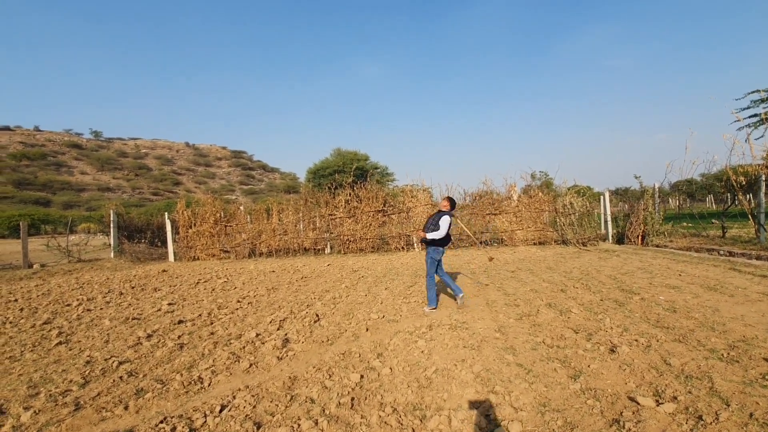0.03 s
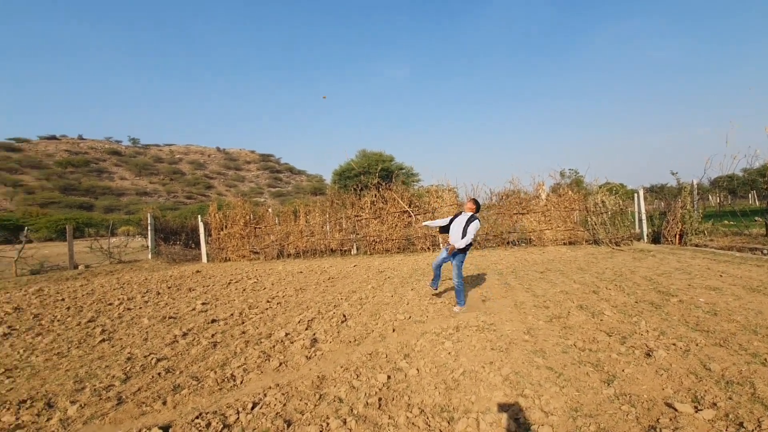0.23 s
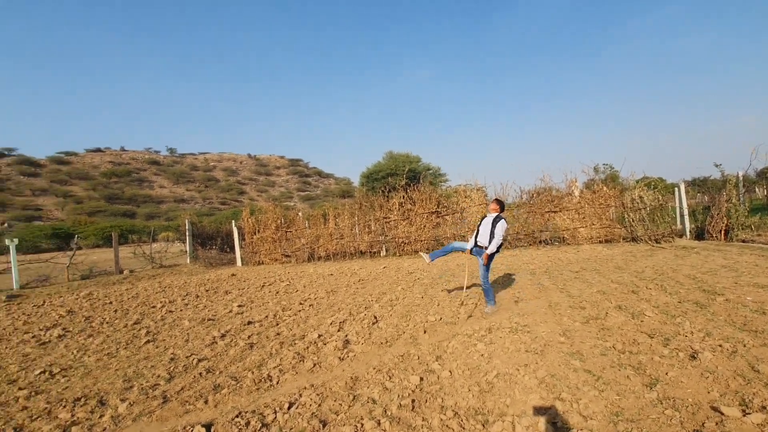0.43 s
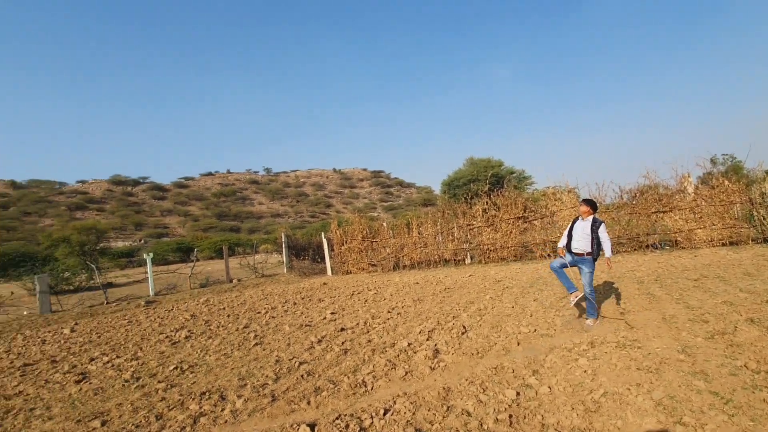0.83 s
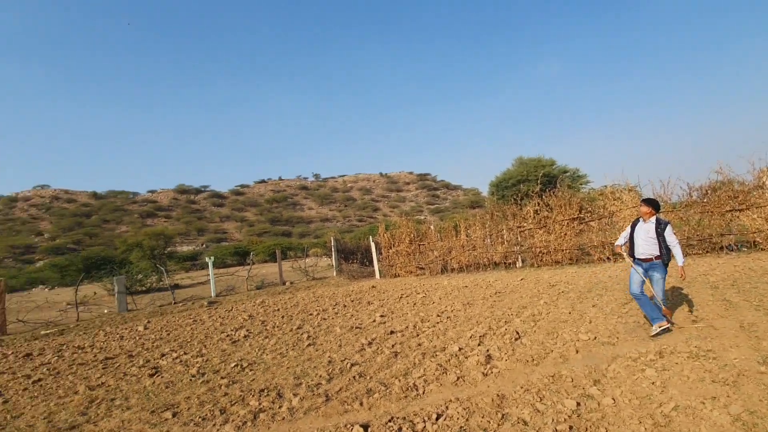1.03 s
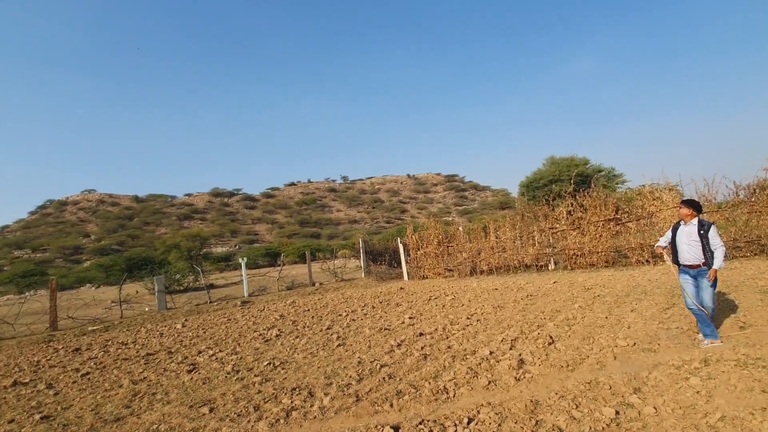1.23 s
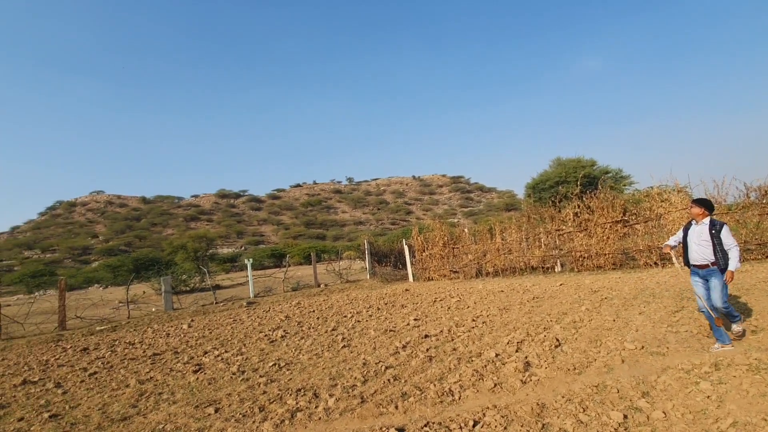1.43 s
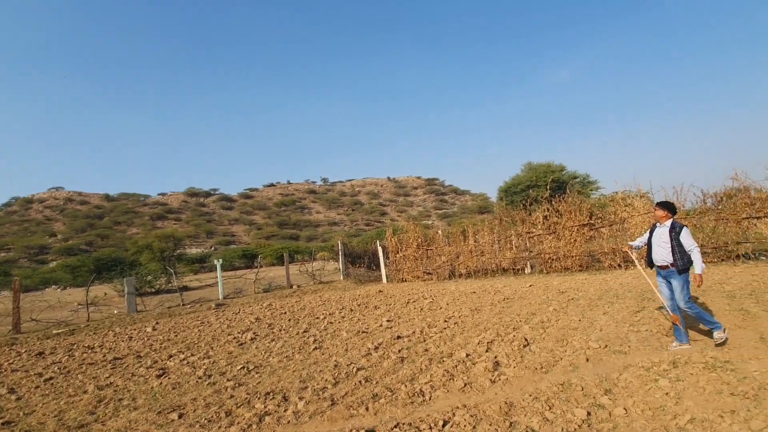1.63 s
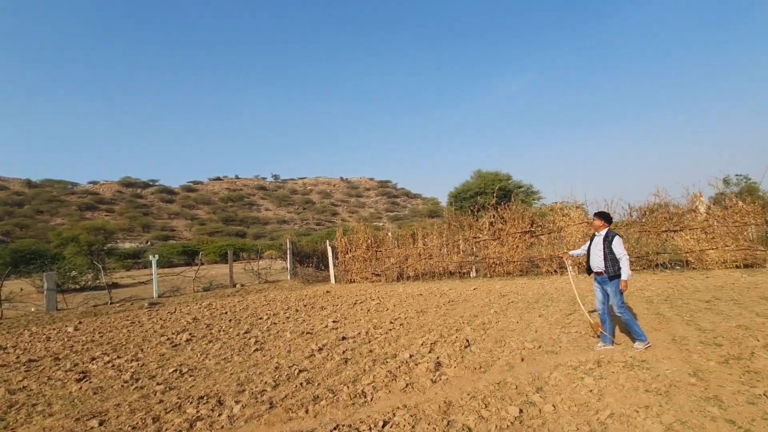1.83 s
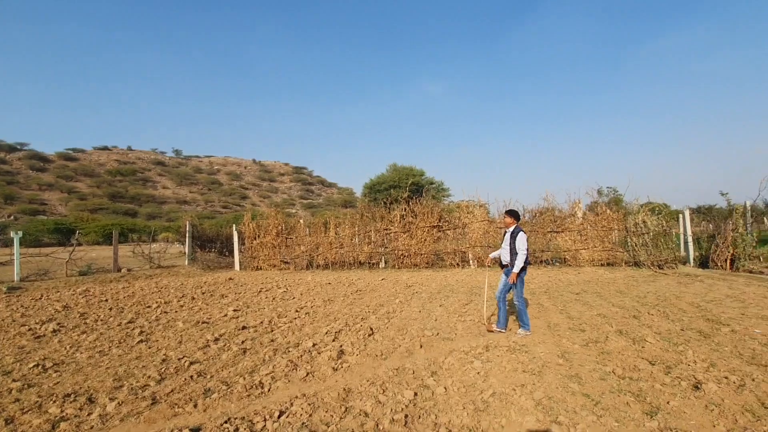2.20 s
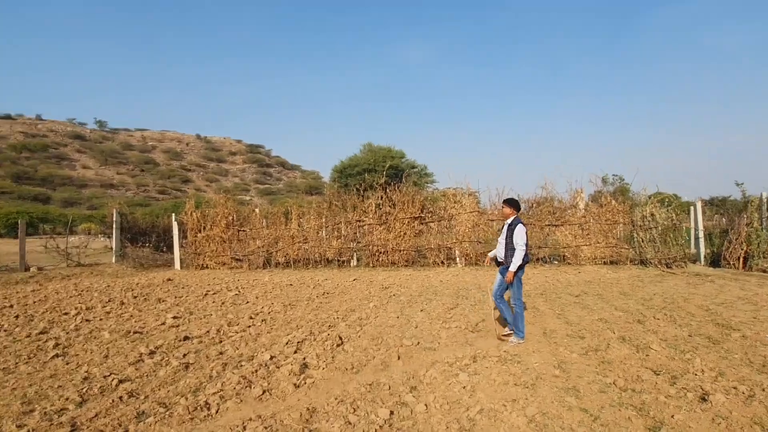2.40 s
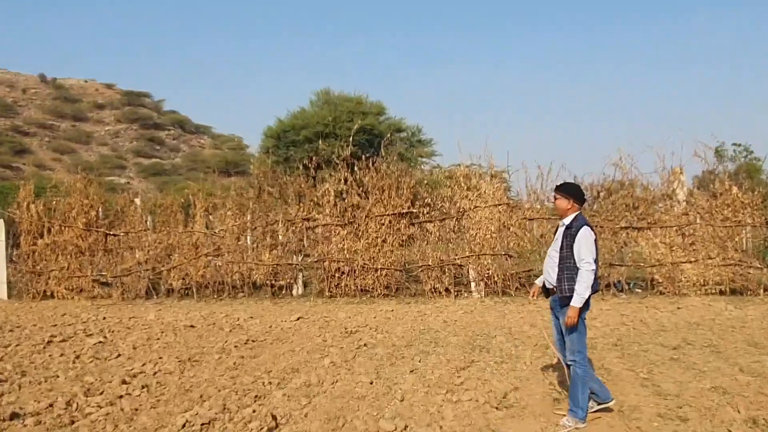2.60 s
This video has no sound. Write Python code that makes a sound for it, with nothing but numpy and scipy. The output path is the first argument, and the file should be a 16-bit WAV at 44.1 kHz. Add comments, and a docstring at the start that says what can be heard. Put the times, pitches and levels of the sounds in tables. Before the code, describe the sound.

A sling whirled and cracked once in an open field, with wind rumbling low.

```python
"""A ploughed field, with quiet country air and far birds. A sling is whirled: the cord swishes,
its tip cracks at the release, and the field scatters the crack back.
The slack cord whooshes round and slaps the dry soil; crumbs patter down and a foot scuffs.
Throughout, gusts buffet the two microphone ports in turn with rumble and low thumps."""
import sys
import numpy as np
from scipy.fft import rfft, irfft, next_fast_len
from scipy.io import wavfile
from scipy.ndimage import map_coordinates

SR = 44100
rng = np.random.default_rng(int(sys.argv[2]) if len(sys.argv) > 2 else 0)


def store_wav(level_fs):
    """Save 16-bit WAV to argv[1]."""
    pcm = np.round(np.clip(np.atleast_2d(level_fs), -1, 1) * 32767)
    wavfile.write(sys.argv[1], SR, pcm.T.astype(np.int16))


N = 121275

# Tone colours, as relative spectral density (f/Hz, level/dB)
AIR_TONE = [(100, 5.5), (300, 8.5), (600, 1.5), (1200, -3), (2200, -5.5), (4200, -8.5), (5500, -14),
            (7300, -21), (10000, -17), (15000, -15.5)]
RUMBLE_TONE = [(22, -26.5), (40, -8), (65, 0.5), (110, -16.5), (200, -28.5), (400, -45), (2500, -100)]
TREAD_TONE = [(200, 4), (800, 5), (1700, -8), (3000, -2), (6000, -15), (12000, -19)]
SHUFFLE_TONE = [(300, -17), (800, 1), (1200, 4.5), (1900, -7), (3000, -2), (4100, 1.5), (4800, -14),
                (8000, -30)]
SOIL_TONE = [(200, 3.5), (600, 9.5), (1000, -0.5), (2000, 1), (2700, -9.5), (4500, -2.5), (9500, -9.5),
             (11500, -12.5), (15000, -11.5)]
SLAP_BODY_TONE = [(250, -9), (650, -2), (1000, -13.5), (3000, -25)]
SWISH_TONE = [(60, -23), (150, 4.5), (320, 3), (450, -8.5), (600, -2), (1000, -13.5), (1650, -15.5),
              (2100, -25), (5500, -32), (10000, -43.5), (14000, -48.5)]
CORD_HISS_TONE = [(3000, -3.5), (5500, -2.5), (7500, -16), (9500, 0.5), (11500, -6.5), (14000, -22)]
WHUMP_TONE = [(120, -4.5), (220, -12.5), (300, 2), (420, -16.5), (560, -10.5), (900, -27), (2000, -52)]
SNAP_TONE = [(1000, 7.5), (3500, 22), (12000, -5.5), (15000, 4.5)]
CRACK_HISS_TONE = [(200, 3), (900, 3), (1600, 4.5), (2000, -8), (2800, -11), (3800, -10.5), (5000, -5.5),
                   (7000, -12), (11000, -11.5), (15000, -7)]
SCATTER_TONE = [(100, -5), (400, 6), (900, -2.5), (2000, -7), (4000, -9), (7000, -21), (11000, -19.5),
                (15000, -23)]
# Stereo image of the field (f/Hz, left-right correlation)
STEREO_LIKENESS = [(300, 0.96), (1200, 0.71), (2500, 0.39), (6000, 0.37)]
# EQ the ports put on the sling (f/Hz, left gain/dB, right gain/dB)
PORT_EQ = [(1560, -1, -0.5), (3500, -2, 1), (5500, -3.5, 3), (6800, -13, 1.5), (8100, -2, -9),
           (8730, -6.5, 5.5), (9150, -7, 8), (12300, -8.5, 3.5), (15000, -6.5, -1.5)]

# Fader ride of the country air (t/s, level/dB)
AIR_RIDE = [(0, -74.5), (.8, -75.5), (1.3, -73.5), (1.9, -73), (2.3, -74.5), (2.75, -77)]
# Far whistles (t/s, length/s, start f/Hz, end f/Hz, level/dB)
BIRD_CALLS = [(1.125, .067, 2560, 2810, -79), (1.502, .12, 1897, 2150, -78), (1.72, .13, 2034, 2160, -81)]
# Wind bed on the ports (t/s, left level/dB, right level/dB)
BREEZE_RIDE = [(0, -48, -46), (.12, -84, -58.5), (.3, -49.5, -50), (.7, -49, -45.5), (.85, -56.5, -55),
               (1.15, -47.5, -58), (1.45, -49.5, -34.5), (1.7, -40.5, -46), (2, -48, -40),
               (2.35, -51, -48.5), (2.46, -50, -54.5), (2.75, -59.5, -56)]
# Eddies hitting a port (t/s, port L or R, relative level/dB, top edge f/Hz)
EDDY_HITS = [(0.161, "R", -37.5, 86.5), (0.214, "R", -34.5, 89), (0.321, "R", -24, 115),
             (0.319, "L", -30.5, 122), (0.417, "R", -34, 85), (0.584, "R", -40, 88),
             (0.615, "L", -36.5, 73.4), (0.675, "R", -32.5, 115), (0.927, "R", -32.5, 80),
             (0.999, "L", -33, 71), (1.098, "L", -29, 72), (1.264, "R", -23.5, 145), (1.422, "R", -29, 133),
             (1.489, "R", -24.5, 141.5), (1.552, "R", -31, 70.8), (1.611, "L", -27, 70.3),
             (1.618, "R", -23.5, 74), (1.684, "L", -27, 120), (1.72, "L", -27.5, 215),
             (1.729, "R", -28.5, 76.3), (1.803, "L", -29, 84.7), (1.85, "R", -31.5, 80),
             (1.903, "L", -28, 118), (1.977, "L", -26, 108.5), (2.099, "L", -34, 75), (2.16, "L", -30, 69),
             (2.179, "R", -36.5, 145), (2.307, "L", -33.5, 64), (2.316, "R", -34, 79),
             (2.36, "L", -30.5, 79), (2.382, "R", -33.5, 92.5), (2.512, "L", -37, 67),
             (2.732, "L", -42, 70)]
# Soft footfalls (t/s, level/dB, decay/s, top edge f/Hz)
FOOTFALLS = [(2.105, -68, .0045, 1690), (2.575, -67, 0.0064, 5200)]

# Pressure waves of the cord meeting the soil (t/s, half width/s, peak level/dB)
SOIL_THUDS = [(0.5286, 0.00097, -31), (0.5331, 0.00056, -35)]
# Hard ticks of knots and pebbles (t/s, peak level/dB, low edge f/Hz)
HARD_TICKS = [(.5312, -22.5, 900), (.5484, -27.5, 3400), (.5745, -43, 4500), (.6085, -40, 4200),
              (.651, -57, 5500)]
# Cord and clods striking the soil (t/s, level/dB, decay/s, low edge f/Hz)
SOIL_SLAPS = [(.5266, -50, .0012, 300), (.5298, -46, .0026, 300), (.5312, -41, .0005, 300),
              (.5388, -54, .001, 2500), (.5503, -49, .0016, 2500)]
# Showers of dry crumbs (t/s, level/dB, hold/s, decay/s, low edge f/Hz, top edge f/Hz)
CRUMB_SHOWERS = [(0.537, -60.5, 0.0088, 0.049, 347, 14000), (0.545, -71, 0.07, .022, 6100, 15000),
                 (0.607, -63.5, .002, .0094, 4600, 13000), (0.808, -74.5, 0.022, 0.058, 9800, 12000),
                 (1.189, -90, .065, .089, 9000, 10900)]

# Fader rides of the cord's swish and of its thin, lingering hiss (t/s, level/dB)
SWISH_RIDE = [(.06, -78.5), (.125, -70), (.17, -52.5), (.183, -55.5), (.216, -51), (.233, -53),
              (.25, -49.5), (.308, -58), (.32, -38.5), (.343, -56), (.357, -50), (.383, -65.5),
              (.412, -53.5), (.45, -67.5), (.6, -66.5), (.7, -76)]
CORD_HISS_RIDE = [(.07, -95), (.17, -76), (.25, -67), (.33, -79), (.46, -85), (.7, -85), (1.4, -101.5)]
# The slack cord coming round (t/s, f/Hz, level/dB)
WHOOSH_GLIDE = [(.475, 146, -74), (.495, 157, -42), (.515, 219, -47), (.528, 282, -53), (.54, 249, -57.5)]
# Pressure waves of the crack (delay/s, half width/s, peak level/dB)
SHOCK_WAVES = [(0.017, 0.00054, -39), (-.0008, 0.00052, -35), (.0003, 0.00016, -26), (.0009, 0.00075, -27),
               (.0002, 0.0029, -39), (0.0123, 0.0022, -29)]
# Brief ring of the crack (f/Hz, level/dB, decay/s)
CRACK_PARTIALS = [(352, -35.5, .004), (546, -41, 0.0026), (780, -38.5, 0.0059), (1230, -38.5, 0.0033),
                  (1637, -33, 0.0025), (2160, -43.5, 0.0053), (2910, -46, 0.0069)]


def amp(db):
    """Gain of a level in dB."""
    return 10 ** (np.asarray(db) / 20)


def unit(x):
    """x at rms 1."""
    return x / np.sqrt(np.mean(x ** 2) + 1e-20)


def along(points, hz):
    """(f/Hz, value) points read on a log frequency axis."""
    f, v = np.transpose(points)
    return np.interp(np.log(hz + 1), np.log(f), v)


def since(s):
    """Seconds since s, for every sample."""
    return np.arange(N) / SR - s


def curves(rows):
    """One automation curve for each column after the time."""
    s, *cols = np.transpose(rows)
    return [np.interp(since(0), s, c) for c in cols]


def filtered(x, response):
    """x through an EQ, given as gain against frequency."""
    size = next_fast_len(N + 8192)
    return irfft(rfft(x, size) * response(np.fft.rfftfreq(size, 1 / SR)), size)[..., :N]


def below(hz, edge_hz, order):
    """Low-pass gain."""
    return 1 / np.sqrt(1 + (hz / edge_hz) ** (2 * order))


def above(hz, edge_hz, order):
    """High-pass gain."""
    return (hz / edge_hz) ** order * below(hz, edge_hz, order)


def noise(tone):
    """Wide coloured noise of rms 1, unrelated in the two channels."""
    return unit(filtered(rng.standard_normal((2, N)), lambda hz: amp(along(tone, hz))))


def field_noise(tone):
    """Coloured noise from the field: centred in the bass, diffuse in the treble."""
    spread = lambda hz: np.arccos(np.clip(along(STEREO_LIKENESS, hz), -1, 1)) / 2
    mid, side = filtered(noise(tone), lambda hz: np.array([np.cos(spread(hz)), np.sin(spread(hz))]))
    return unit(np.array([mid + side, mid - side]))


def wobble(per_s):
    """A smooth random curve through per_s points a second."""
    return map_coordinates(rng.standard_normal(N // 4), [np.arange(N) * per_s / SR], mode="wrap")


def burst(s, rise_s, fall_s, hold_s=0):
    """Envelope that swells up to time s, holds and dies away."""
    t = since(s)
    return np.exp(np.minimum(t, 0) / rise_s - np.maximum(t - hold_s, 0) / fall_s)


def wave(s, width_s):
    """One pressure wave: a push, then suction."""
    u = since(s) / width_s
    return -u * np.exp((1 - u ** 2) / 2)


def tick(s, response):
    """One dry click of peak 1 at s, coloured at minimum phase so the attack stays hard."""
    size = 1024
    gain = np.maximum(response(np.fft.rfftfreq(size, 1 / SR)), 1e-3)
    cepstrum = irfft(np.log(gain))
    cepstrum[1:size // 2] *= 2
    cepstrum[size // 2 + 1:] = 0
    click = irfft(np.exp(rfft(cepstrum)))
    return np.pad(click / np.abs(click).max(), (round(s * SR), N))[:N]


def country_air():
    """A quiet, wide bed of air that swells gently."""
    return amp(curves(AIR_RIDE)[0]) * noise(AIR_TONE)


def birds():
    """Short rising whistles, blurred by distance."""
    out = np.zeros((2, N))
    for s, length, start_hz, end_hz, db in BIRD_CALLS:
        progress = np.clip(since(s) / length, 0, 1)
        blur = unit(filtered(rng.standard_normal((2, N)), lambda hz: below(hz, 50, order=2)))
        phase = 2 * np.pi * np.cumsum(start_hz + (end_hz - start_hz) * progress) / SR
        out += amp(db) * np.sin(np.pi * progress) * np.sin(phase + .5 * blur)
    return out


def wind(eddy_width_s=.011, eddy_trim_db=-2, turbulent_share=.54, low_hz=43.5, ceiling_hz=280):
    """Low rumble on both ports; each eddy thumps one of them with a short, turbulent ring."""
    out = amp(curves(BREEZE_RIDE)) * noise(RUMBLE_TONE)
    for s, port, db, top_hz in EDDY_HITS:
        t = since(s)
        window = np.exp(-(t / eddy_width_s) ** 2 / 2)
        ring_hz = 71.1 * (top_hz / 93) ** .47  # brighter eddies ring higher
        ring = window * np.sin(2 * np.pi * (ring_hz * t + rng.random()))
        band = lambda hz: above(hz, low_hz, 2) * below(hz, top_hz, 4) * below(hz, ceiling_hz, 3)
        puff = filtered(window * rng.standard_normal(N), band)
        thump = unit(np.sqrt(1 - turbulent_share) * unit(ring) + np.sqrt(turbulent_share) * unit(puff))
        out["LR".index(port)] += amp(db + eddy_trim_db) * thump * np.sqrt(np.mean(window ** 2))
    return out


def footsteps(heel_db=8):
    """Faint footfalls, each a crunch and a heel tick; the last trails into a shuffle on loose earth."""
    out = amp(-78) * burst(2.58, rise_s=.0068, fall_s=.29) * noise(SHUFFLE_TONE)
    for s, db, fall, top_hz in FOOTFALLS:
        grit = unit(filtered(field_noise(TREAD_TONE), lambda hz: below(hz, top_hz, order=4)))
        crunch = burst(s, .0006, fall) * grit
        heel = tick(s, lambda hz: amp(along(TREAD_TONE, hz)) * below(hz, top_hz, order=2))
        out += amp(db) * (crunch + amp(heel_db) * heel)
    return out


def soil_impact():
    """The cord lands: thuds and a dull body under hard ticks and sharp slaps."""
    thuds = sum(amp(db) * wave(s, width) for s, width, db in SOIL_THUDS)
    body = amp(-44) * burst(.5315, rise_s=.00084, fall_s=.011) * field_noise(SLAP_BODY_TONE)
    out = thuds + body
    for s, db, low_hz in HARD_TICKS:
        out += amp(db) * tick(s, lambda hz: amp(along(SOIL_TONE, hz)) * above(hz, low_hz, order=3))
    for s, db, fall, low_hz in SOIL_SLAPS:
        slap = unit(filtered(field_noise(SOIL_TONE), lambda hz: above(hz, low_hz, order=2)))
        out += amp(db) * burst(s, .00012, fall) * slap
    return out


def crumbs(size_spread_db=4, grain_samples=16):
    """Dry crumbs of mixed sizes patter down in grainy showers."""
    out = np.zeros((2, N))
    for s, db, hold, fall, low_hz, top_hz in CRUMB_SHOWERS:
        sizes_db = size_spread_db * rng.standard_normal(N // grain_samples + 1)
        grains = rng.standard_normal((2, N)) * amp(np.repeat(sizes_db, grain_samples)[:N])
        band = lambda hz: amp(along(SOIL_TONE, hz)) * above(hz, low_hz, 7) * below(hz, top_hz, 9)
        out += amp(db) * burst(s, .0024, fall, hold) * unit(filtered(grains, band))
    return out


def cord_swing(turbulence_db=1.7):
    """The cord cuts the air: a turbulent swish, thin hiss, one low push and a follow-through whump."""
    swish_db = curves(SWISH_RIDE)[0] + turbulence_db * wobble(per_s=92)
    fade_out = burst(0, rise_s=.01, fall_s=.096, hold_s=.81)
    swish = amp(swish_db) * field_noise(SWISH_TONE) * fade_out
    hiss = amp(curves(CORD_HISS_RIDE)[0]) * noise(CORD_HISS_TONE)
    push = amp(-34) * wave(.23, width_s=.0032)
    whump = amp(-35) * burst(.324, rise_s=.0079, fall_s=.011) * field_noise(WHUMP_TONE)
    return swish + hiss + push + whump


def cord_whoosh():
    """The slack cord comes round with a low, rising, fluttering tone."""
    pitch_hz, level_db = curves(WHOOSH_GLIDE)
    flutter = unit(filtered(rng.standard_normal(N), lambda hz: below(hz, 68, order=2)))
    tone = np.sin(2 * np.pi * np.cumsum(pitch_hz) / SR + .5 * flutter)
    return amp(level_db) * tone * burst(.458, rise_s=.019, fall_s=.014, hold_s=.086)


def crack(s=.2687, rise_s=.0019, tail_t60_s=.31, grit_db=1.5):
    """The tip snaps: pressure waves, a brief ring and hiss, and a tail scattered by furrows and fence."""
    shock = sum(amp(db) * wave(s + delay, width) for delay, width, db in SHOCK_WAVES)
    snap = amp(-23) * burst(s, rise_s=.0001, fall_s=.00025) * noise(SNAP_TONE)
    ring = sum(amp(db) * burst(s, rise_s, fall) * np.sin(2 * np.pi * hz * since(s))
               for hz, db, fall in CRACK_PARTIALS)
    hiss = amp(-32.5) * burst(s, rise_s, fall_s=.0043) * field_noise(CRACK_HISS_TONE)
    scatter = unit(field_noise(SCATTER_TONE) * amp(grit_db * wobble(per_s=1500)))
    tail = amp(-45) * burst(s, rise_s, fall_s=tail_t60_s / np.log(1000)) * scatter
    return shock + snap + ring + hiss + tail


def scene(left_lag_s=.0001):
    """The mix: the sling, earlier and brighter in the right port, over air, steps, wind and birds."""
    port_hz, *ports_db = np.transpose(PORT_EQ)
    colour = lambda hz: amp([along(np.transpose([port_hz, db]), hz) for db in ports_db])
    lag = lambda hz: np.exp(1j * np.pi * left_lag_s * np.array([-hz, hz]))
    sling = cord_swing() + cord_whoosh() + crack() + soil_impact() + crumbs()
    placed_sling = filtered(sling, lambda hz: colour(hz) * lag(hz))
    return placed_sling + country_air() + footsteps() + wind() + birds()


def record(dry, top_hz=15850):
    """A brick-wall high cut on the whole mix."""
    return filtered(dry, lambda hz: hz < top_hz)


dry = scene()
out = record(dry)
store_wav(out)
```